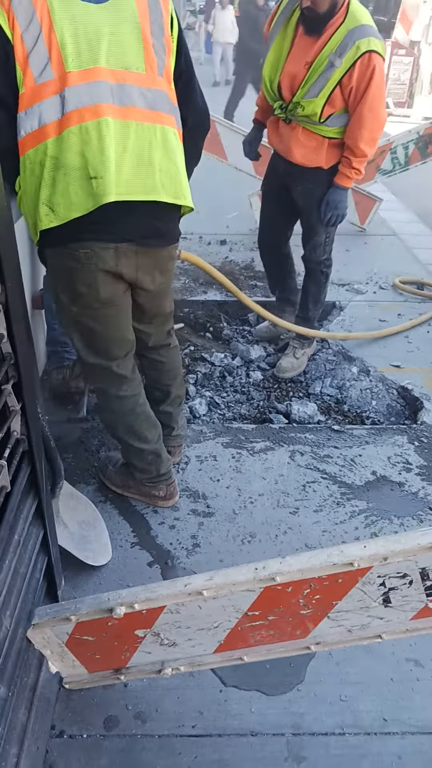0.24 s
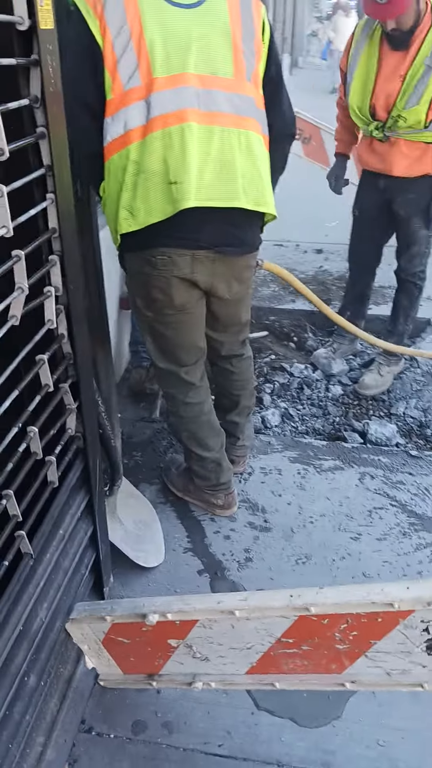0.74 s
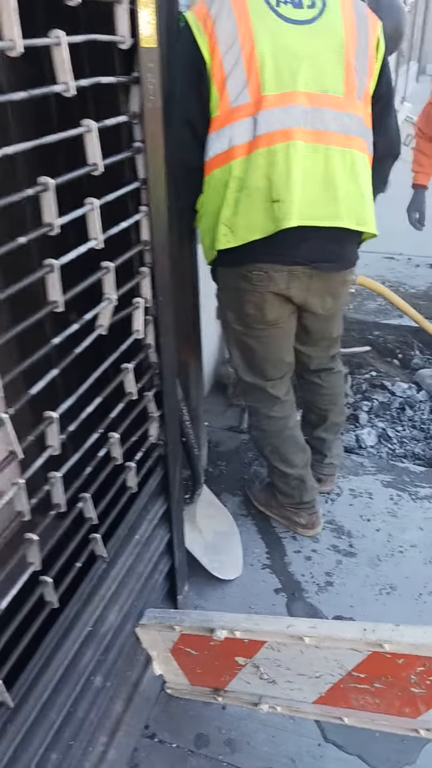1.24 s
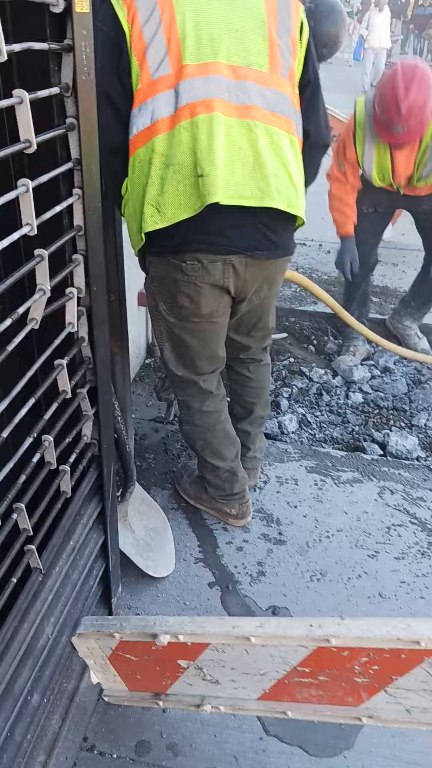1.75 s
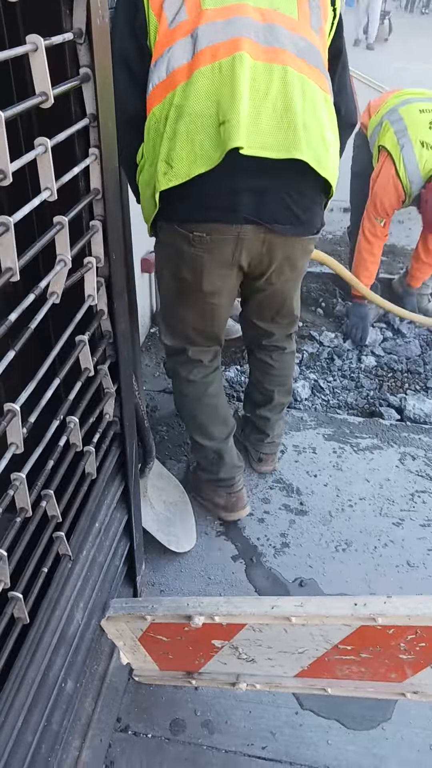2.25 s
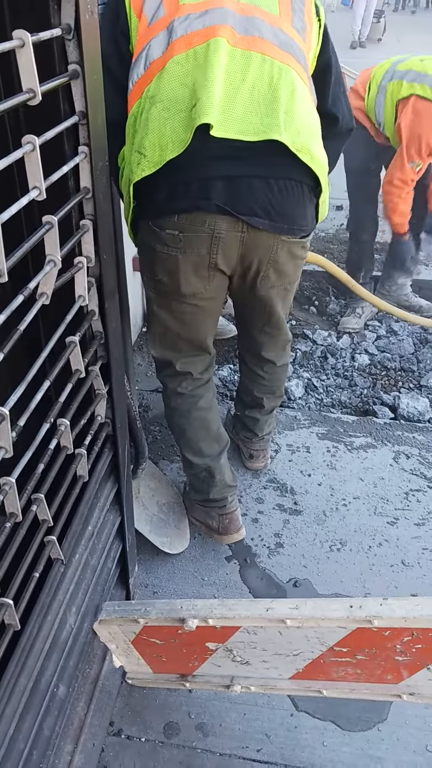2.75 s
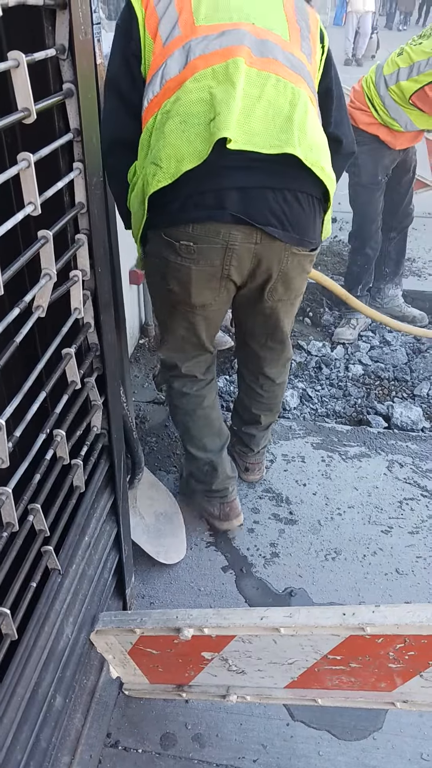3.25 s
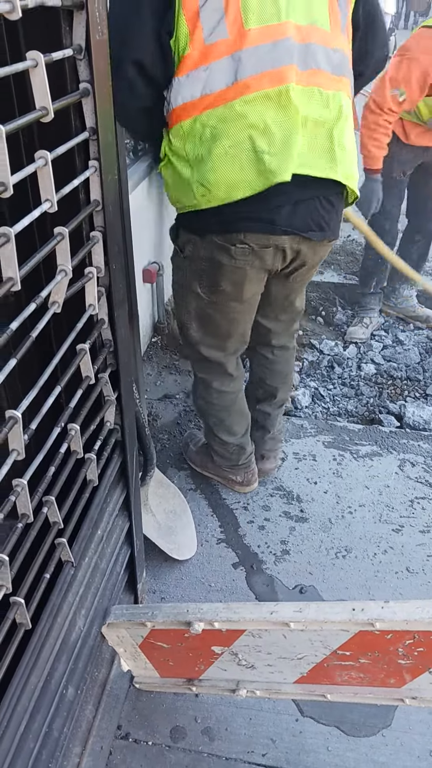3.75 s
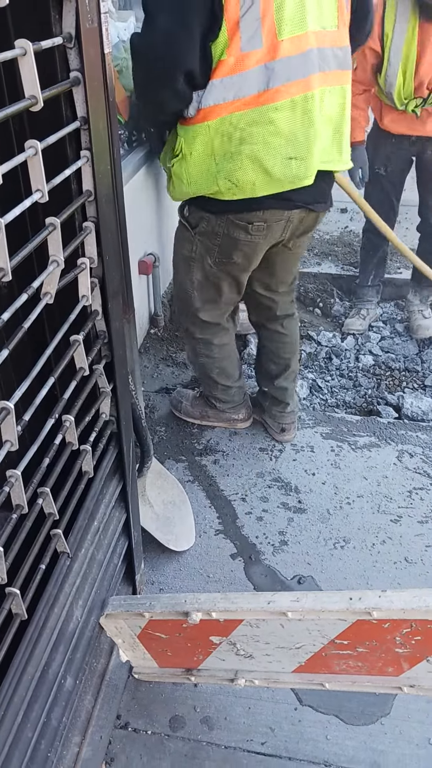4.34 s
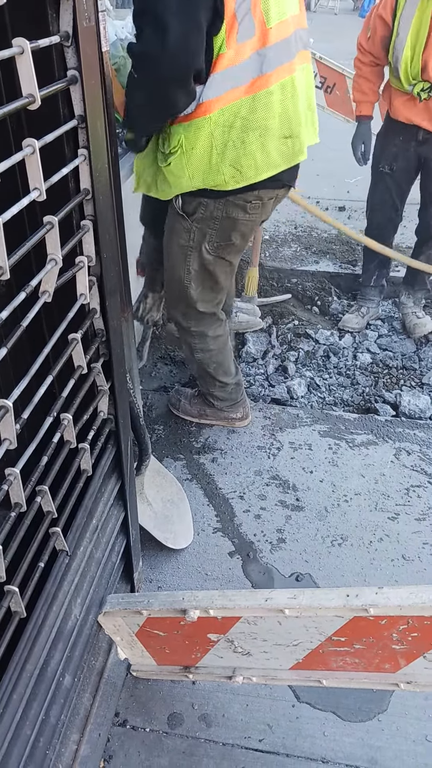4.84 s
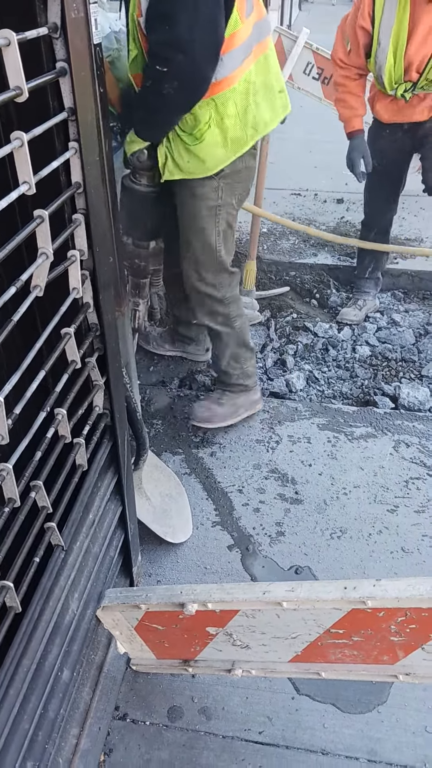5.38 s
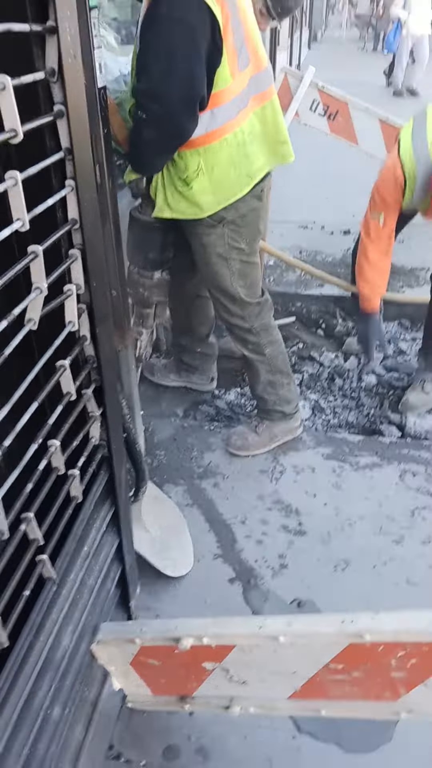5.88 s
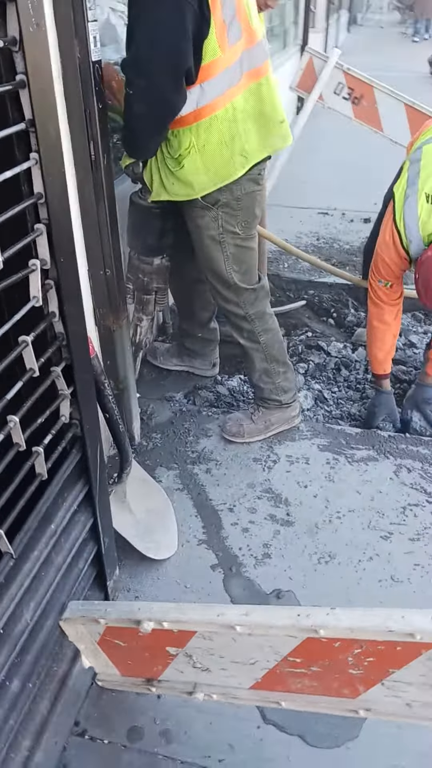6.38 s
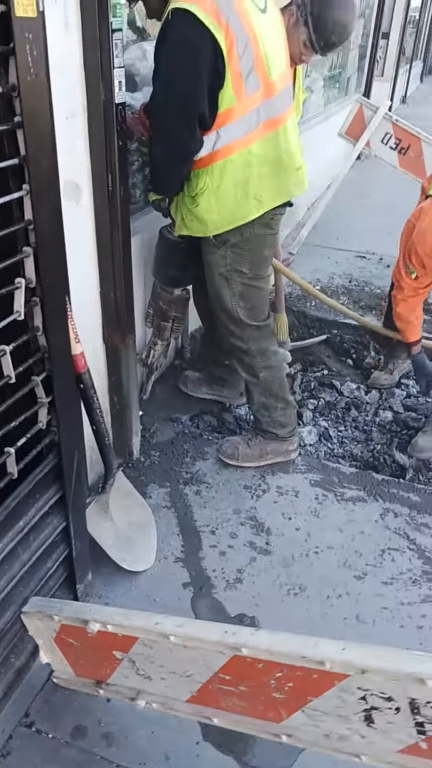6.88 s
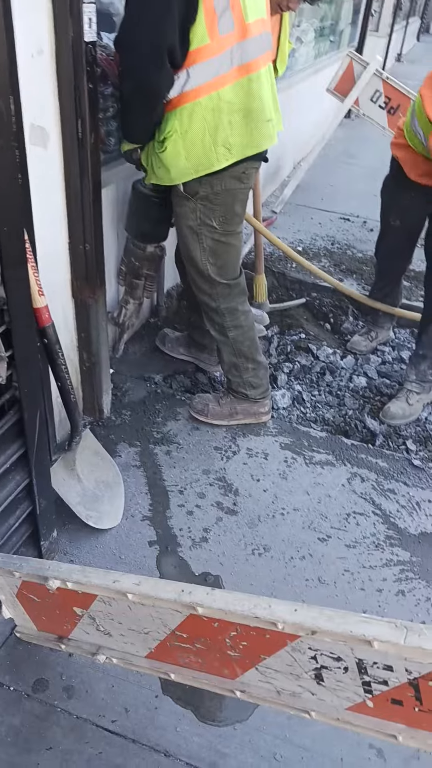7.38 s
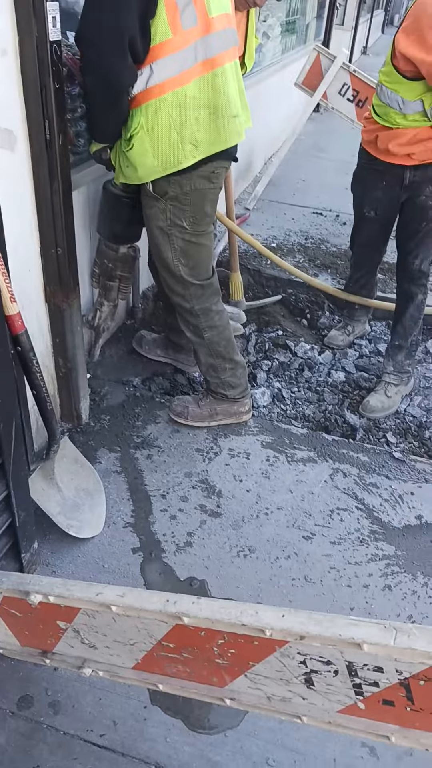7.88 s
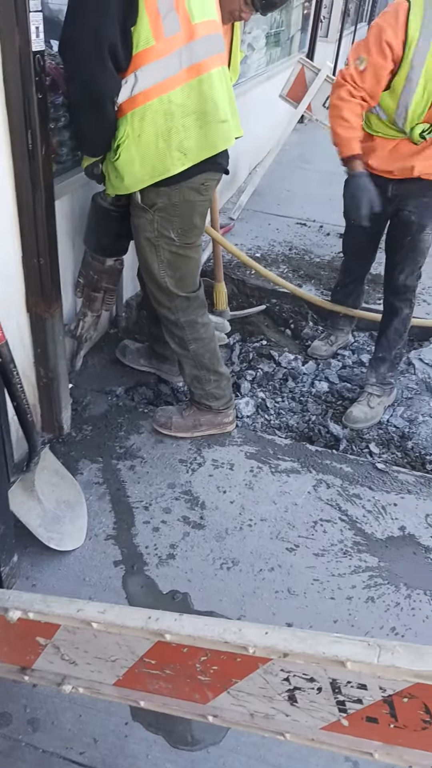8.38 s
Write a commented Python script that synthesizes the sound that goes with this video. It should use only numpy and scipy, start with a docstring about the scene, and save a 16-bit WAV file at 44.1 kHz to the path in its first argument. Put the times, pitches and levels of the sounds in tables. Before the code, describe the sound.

Harsh, rapid jackhammer blows with hissing exhaust stop, the loose bit clanks and scrapes through the break, then hammering resumes until the end on a city street.

```python
"""A breaker hammers pavement about 21 times a second, with pauses in which its loose bit clinks.
Each blow is a crack, a body knock and a collar clank of shaped noise, with exhaust hiss and a ring of the bit.
Exhaust air excites damped chamber modes at the blow, and again at the piston's return.
Behind it a compressor engine sounds as harmonic orders, over rumble, street hiss and a thin air leak.
Street fronts answer with an echo, and two microphone ports pick up the whole."""
import sys
import numpy as np
from scipy import signal
from scipy.fft import rfft, irfft, next_fast_len
from scipy.io import wavfile
from scipy.ndimage import uniform_filter1d

SR = 44100
rng = np.random.default_rng(int(sys.argv[2]) if len(sys.argv) > 2 else 0)


def convert_level_to_amplitude(level_db):
    """Map a level in decibels to its linear amplitude factor."""
    exponent = np.asarray(level_db, float) / 20
    return 10 ** exponent


def output_pcm(signal):
    """Save a mono or channel-first signal as 16-bit PCM at the path in sys.argv[1].

    Samples are clipped to [-1, 1] before scaling.
    """
    pcm = np.clip(np.atleast_2d(signal).T, -1, 1) * 32767
    wavfile.write(sys.argv[1], SR, np.round(pcm).astype(np.int16))


N = 380141

RETURN_S = 0.0255  # from the blow to the piston's return

# times at which the operator's stance changes: in front of the tool, then beside it, then leaning on it: start_s
MOVES_S = [4.5, 6.75]

# modes of the steel bit, before each use adds damping and tilt: mode_hz, relative_level_db, t60_s
BIT = [(1860, -2, .09), (3480, 0, .13), (5520, -2, .11), (7830, -6, .1), (9000, -14, .1), (10300, -11, .12),
       (10590, -3, .15), (11090, -1, .1), (11900, -10, .1), (12970, -5, .14), (13400, -4, .14)]

# spectral density of a blow in each stance: frequency_hz, relative_density_db
CRACK_HIDDEN = [(190, -29), (330, -6.5), (478, -6.5), (726, -10.5), (846, -6), (1010, -16.5), (1310, -11),
                (1730, -12), (1900, -9), (2770, -17.5), (3200, -21.5), (4160, -46), (7040, -120)]
CRACK_OPEN = [(190, -8), (330, -5), (411, -10.5), (562, -13), (636, -14), (740, -13.5), (1080, -19),
              (1190, -13), (1410, -15), (2090, -7.5), (2670, -20), (3200, -16.5), (4160, -45), (7040, -120)]
CRACK_LEANING = [(190, -36), (330, 2), (407, 0.5), (567, 0.5), (680, -9), (806, -4.5), (887, -20),
                 (939, -6.5), (1510, -7), (1830, 0), (2410, -4.5), (3200, -9), (4160, -50), (7040, -120)]
CRACKS = [CRACK_HIDDEN, CRACK_OPEN, CRACK_LEANING]


def evened(x):
    """Normalization: scales a signal to an rms of 1."""
    return x / np.sqrt(np.mean(x ** 2) + 1e-20)


def read(points, hz):
    """Spectral interpolation: reads a table on a log-frequency axis."""
    f, value = np.transpose(points)
    return np.interp(np.log(hz + 1), np.log(f + 1), value)


def noise(colour):
    """Spectral shaping: two uncorrelated steady noises of one colour, together at rms 1."""
    size = next_fast_len(N)
    spectrum = rfft(rng.standard_normal((2, size)))
    spectrum = spectrum * convert_level_to_amplitude(read(colour, np.fft.rfftfreq(size, 1 / SR)))
    return evened(irfft(spectrum, size)[:, :N])


def train(s, size):
    """Impulse excitation: single clicks of given sizes at given times."""
    out = np.zeros(N + SR)
    at = np.clip(np.round(np.asarray(s) * SR).astype(int), 0, N)
    np.add.at(out, at, size)
    return out[:N]


def bursts(s, db, rise, t60):
    """Incoherent addition: the envelope of noise bursts whose powers add up."""
    t = np.arange(SR // 4) / SR
    power_shape = (1 - np.exp(-t / rise)) ** 2 * convert_level_to_amplitude(-2 * 60 * t / t60)
    power = signal.oaconvolve(train(s, convert_level_to_amplitude(2 * db)), power_shape / power_shape.max())[:N]
    return np.sqrt(np.abs(power))


def street():
    """Superposition: compressor engine orders, traffic rumble, far hiss and a narrow-band air leak."""
    # course of the background; the compressor labours after the false start; levels precede the mix gains:
    # time_s, engine_third_order_hz, engine_level_db, rumble_level_db, hiss_level_db
    background = [(2.35, 63.8, -35, -40.5, -47.5), (2.6, 63.8, -42, -41.5, -50.5),
                  (3.3, 63.8, -33.5, -43.5, -50), (3.8, 63.8, -39, -37.5, -46.5),
                  (4.2, 63.8, -33.5, -44, -49.5), (4.8, 63.8, -39, -41.5, -49.5),
                  (5.13, 62.5, -27, -36, -43.5), (5.2, 62.5, -33, -31.5, -40.5),
                  (5.5, 62.5, -25, -31.5, -40), (5.62, 61.7, -33, -37, -41.5), (8.6, 62.6, -30.5, -44, -52)]
    # harmonics of the engine's rotation: order, relative_level_db
    engine_orders = [(2, -10), (3, -0.5), (4, -2.5), (6, -5.5), (8, -11)]
    # spectral density of the rumble: frequency_hz, relative_density_db
    rumble_colour = [(12, -46), (20, -19), (38, -13), (49, -3.5), (70, -2.5), (97, -14.5), (170, -8),
                     (187, -15.5), (258, -18), (500, -34), (650, -68), (1100, -120)]
    # spectral density of the street hiss: frequency_hz, relative_density_db
    street_colour = [(240, -5.5), (400, 3.5), (511, -3), (1030, -5.5), (1380, -2), (1720, -5.5),
                     (2800, -9.5), (5760, -19.5), (6310, -20), (6820, -17.5), (7360, -21.5), (12400, -15),
                     (15600, -18.5)]
    leak_hz, leak_half_width_hz, leak_under_hiss_db = 6830, 160, -18.5
    waver_db, waver_s = 1.5, 0.05  # rms depth and averaging time

    s, *columns = np.transpose(background)
    hz, engine_db, rumble_db, hiss_db = (np.interp(np.arange(N) / SR, s, c) for c in columns)
    turns = np.cumsum(hz / 3) / SR
    engine = 0
    for order, db in engine_orders:
        phase = rng.random() + 0.13 * rng.standard_normal((2, 1))  # in turns, scattered between both points
        engine = engine + convert_level_to_amplitude(db) * np.sin(2 * np.pi * (order * turns + phase))
    waver = evened(uniform_filter1d(rng.standard_normal(N), round(waver_s * SR)))
    engine = evened(engine) * convert_level_to_amplitude(waver_db * waver)  # the hum wavers
    leak = noise([(leak_hz - leak_half_width_hz, -40), (leak_hz, 0), (leak_hz + leak_half_width_hz, -40)])
    far = noise(street_colour) + convert_level_to_amplitude(leak_under_hiss_db) * leak
    return convert_level_to_amplitude(engine_db - 5) * engine + convert_level_to_amplitude(rumble_db + 2) * noise(rumble_colour) + convert_level_to_amplitude(hiss_db + 2.5) * far


def fronts(x):
    """Diffuse reflection: sparse echoes of random sign from the street fronts, each band decaying at its own rate."""
    # echo decay: frequency_hz, t60_s
    front_decay = [(100, 0.41), (500, 0.31), (2000, 0.4), (8000, 0.1), (16000, 0.15)]
    taps = np.zeros((2, SR // 2))
    at = np.arange(300, SR // 2 - 20, 20) + rng.integers(0, 20, (2, (SR // 2 - 301) // 20))
    np.put_along_axis(taps, at, rng.choice([-1., 1.], at.shape), 1)
    hz, t, z = signal.stft(taps, SR, nperseg=256)
    decay = convert_level_to_amplitude(-60 * t / read(front_decay, hz)[:, None])
    tail = signal.istft(z * decay, SR, nperseg=256)[1]
    return signal.fftconvolve(x, tail / np.linalg.norm(tail[0]), axes=1)[:, :N]


def bit_ring(low, high, at, patchy_db, damping, split, tilt_db):
    """Modal resonance: two noise drives ring the bit's low and high modes, each blow favouring different ones."""
    t, out = np.arange(SR // 4) / SR, np.zeros((2, N))
    which = np.searchsorted(np.sort(at), np.arange(N) / SR)
    chance = rng.standard_normal((len(at) + 1, len(BIT)))
    for k, (hz, db, t60) in enumerate(BIT):
        mode_db = db + tilt_db * np.log2(max(hz / split, 1))  # tilt per octave above the split
        mode = convert_level_to_amplitude(mode_db - 60 * damping * t / t60) * np.sin(2 * np.pi * hz * t)
        envelope = low if hz < split else high
        drive = envelope * rng.standard_normal((2, N)) * convert_level_to_amplitude(patchy_db * chance[which, k])
        out += signal.oaconvolve(drive, mode[None], axes=1)[:, :N]
    return out


def clinks():
    """Contact excitation: the loose bit knocks and drags, ringing its modes and scuffing as noise."""
    # contacts, ring levels before the mix gains: start_s, low_ring_db, high_ring_db, scuff_db, length_s
    contacts = [(2.877, -87, -78, -42.5, 0.015), (3.09, -63, -79, -53.5, 0.025),
                (3.395, -62, -75, -49, .04), (3.46, -43, -54, -34.5, 0.093),
                (3.731, -42, -47.5, -42.5, 0.084), (3.8, -42, -68, -55, 0.051),
                (3.876, -48, -59, -41, 0.017), (3.894, -35, -49, -40, 0.038), (3.928, -33, -53, -42, 0.038),
                (3.955, -46, -43, -38, 0.043), (4.054, -62, -63.5, -46, 0.011),
                (4.106, -49, -69, -42.5, 0.037), (4.147, -40, -76, -39, 0.024),
                (4.202, -55, -70, -46, 0.025), (4.346, -66, -61, -45.5, .04), (4.907, -34, -49, -39, 0.024),
                (4.926, -32, -46, -50, 0.04), (5.01, -37, -32.5, -46, 0.042), (5.304, -55, -70, -36, 0.032),
                (5.504, -53, -65, -34, 0.082), (5.561, -40, -50, -27, 0.019)]
    # spectral density of the scuff: frequency_hz, relative_density_db
    scuff_colour = [(250, -20), (550, -4), (1000, -7.5), (2000, 4.5), (3800, -3), (6000, -11), (15000, -17)]
    level = np.zeros((3, N))
    for s, *layer_db, length in contacts:
        u = np.arange(round(3 * length * SR)) / SR / length
        shape = np.exp(-u ** 2) * (1 - np.exp(-u / 0.091))
        start = round(s * SR)
        level[:, start:start + len(u)] += np.outer(convert_level_to_amplitude(np.array(layer_db)), shape)
    roughness = evened(uniform_filter1d(rng.standard_normal(N), 90))
    low, high, scuff = level * convert_level_to_amplitude(3 * roughness)
    at = np.array(contacts)[:, 0]
    rung = bit_ring(low, convert_level_to_amplitude(8.5) * high, at, patchy_db=2, damping=2.7, split=BIT[2][0], tilt_db=-9.0)
    return convert_level_to_amplitude(-23.5) * rung + scuff * noise(scuff_colour)


def all_blows():
    """Quasi-periodic excitation: rows (s, hiss, crack, puff, return, low ring, high ring) of every blow."""
    # pace of the two long bursts, one list each: time_s, blows_struck_so_far
    pace = [
        [(0.0051, 0), (1.1214, 23), (1.4535, 30), (1.7414, 36), (1.8884, 39), (2.0784, 43), (2.127, 44)],
        [(5.6132, 0), (6.042, 9), (6.6222, 21), (7.1066, 31), (7.441, 38), (7.8275, 46), (8.2586, 55),
         (8.597, 62)],
    ]
    # mean blow as the work goes on, levels before the mix gains:
    # time_s, hiss_db, crack_db, low_puff_db, return_relative_to_blow_db, bit_ring_db
    work = [(0, -20, -23, -12.5, -7, -38), (.4, -20.5, -24.5, -14.5, -4.5, -33),
            (.9, -18, -22.5, -14, -10.5, -37), (1.3, -19.5, -24.5, -15.5, -4.5, -33.5),
            (1.6, -18, -23, -14.5, -4.5, -30), (1.85, -20, -25.5, -16, -6.5, -36),
            (2.13, -18.5, -21.5, -12.5, -9, -36), (5.62, -18, -23, -13, -4, -32),
            (5.85, -17, -21.5, -14.5, -7.5, -28.5), (5.97, -21, -26, -17.5, -3, -35),
            (6.1, -18.5, -23, -14, -9, -31.5), (6.6, -18, -22.5, -16, -11, -28),
            (6.9, -17.5, -20.5, -20, -12.5, -32.5), (7.05, -20, -25.5, -19.5, -6, -30.5),
            (7.45, -18.5, -24.5, -19, -10.5, -32), (8.0, -17.5, -24, -18.5, -10, -33.5),
            (8.6, -18, -23, -19.5, -10.5, -56)]
    # a deeper bite is louder and bounces the piston less; rows are hiss, crack, puff, return, low and high ring:
    # change_per_bite_db, own_scatter_db (both times a limited random draw)
    scatter = [(0.46, .5), (0.5, 0.3), (0.6, 0), (-3, 2), (0, 2.5), (-2, 2)]
    # uneven blows, and one valve sputter of three quick air puffs near 5.56 s, levels before the mix gains:
    # start_s, hit_db, low_puff_db, return_relative_to_blow_db, bit_ring_db
    stumbles = [(2.182, -23.5, -16.5, -24, -31), (3.481, -29, -16, -4, -32.5), (3.506, -21, -15, -14, -27),
                (3.528, -19.5, -16, -5, -43), (3.5735, -18.5, -13.5, -6.5, -33),
                (3.6215, -15.5, -17.5, -8, -28), (3.6755, -35, -21.5, -10, -51), (4.97, -25, -23, -20, -23),
                (5.005, -25.5, -10, -8, -33), (5.081, -32.5, -18.5, -22, -50), (5.555, -38, -14, -20, -42),
                (5.562, -36, -12, -20, -45), (5.568, -30.5, -14, -20, -43), (5.593, -19, -24, -21, -37)]
    jitter_s, chance_limit = 0.0004, 1.8  # the limit is in standard deviations
    crack_under_hiss_db, high_under_low_ring_db = -3, -7  # in the stumbles

    runs = []
    for run in pace:
        run_s, count = np.transpose(run)
        runs.append(np.interp(np.arange(run[-1][1] + 1), count, run_s))
    s = np.concatenate(runs)
    at, *layers = np.transpose(work)
    mean_db = np.transpose([np.interp(s, at, db) for db in layers + layers[-1:]])  # both rings share a mean
    bite_db, own_db = np.transpose(scatter)
    chance = np.clip(rng.standard_normal((len(s), 2 + len(scatter))), -chance_limit, chance_limit)
    steady_db = mean_db + bite_db * chance[:, 1:2] + own_db * chance[:, 2:]
    steady = np.c_[s + jitter_s * chance[:, 0], steady_db]
    s, hit, puff, back, ring = np.transpose(stumbles)
    odd = np.c_[s, hit, hit + crack_under_hiss_db, puff, back, ring, ring + high_under_low_ring_db]
    rows = np.r_[steady, odd]
    return rows[np.argsort(rows[:, 0])]


def strokes(blows, column, back_db):
    """Reciprocating motion: times and levels of the blows, then of the piston's returns."""
    s, back_under, db = blows[:, [0, 4, column]].T
    return (s, db), (s + RETURN_S, db + back_under + back_db)


def puffs(blows):
    """Cavity resonance: exhaust air kicks the damped chamber modes; the return stroke is duller."""
    # air modes of the exhaust chamber, neighbours in opposite sign: mode_hz, relative_level_db, t60_s
    chamber = [(41.8, -31, 0.096), (91.2, -19, 0.1), (138.5, -0.5, 0.027), (212.6, -10.5, 0.059),
               (290.4, -12, 0.05), (384.6, -11.5, 0.022), (530, -28.5, 0.043), (835, -28.5, 0.036)]
    # added level of the chamber modes above 250 Hz: time_s, level_db
    open_port = [(0, 5), (0.55, 6.5), (0.9, -7), (1.1, -3.5), (1.3, 4.5), (1.5, 5.5), (1.7, -0.5),
                 (1.95, 4.5), (3.55, -5), (5.65, 0.5), (5.9, 7), (6.15, 0.5), (6.4, 4), (7.9, 5.5),
                 (8.4, 0.5)]
    # return puff relative to the blow's, one value for each stance: level_db
    return_puff_db = [-6, -5.5, -3.5]
    # added level of the two deepest chamber modes, one value for each stance: level_db
    deep_mode_db = [-0.2, -1.1, 3.5]
    idle_return_db, return_dull_db_per_octave = -16, -5

    blow_s, blow_db = blows[:, [0, 3]].T
    gap = np.diff(blow_s, append=blow_s[-1] + 0.05)
    running = (gap > 0.035) & (gap < 0.06)
    s = np.r_[blow_s, blow_s + RETURN_S] - 0.0025
    full_return_db = np.take(return_puff_db, np.searchsorted(MOVES_S, blow_s))
    back_db = np.where(running, full_return_db, idle_return_db)  # a full return only at working pace
    puff_db = np.r_[blow_db, blow_db + back_db]
    is_return = np.arange(len(s)) >= len(blows)
    chance = rng.standard_normal((len(s), len(chamber)))
    deep_db = np.take(deep_mode_db, np.searchsorted(MOVES_S, s))
    upper_db = np.interp(s, *np.transpose(open_port))
    t, out = np.arange(SR // 5) / SR, np.zeros(N)
    for k, (hz, db, t60) in enumerate(chamber):
        mode = (-1) ** k * convert_level_to_amplitude(db - 60 * t / t60) * np.sin(2 * np.pi * hz * t) * (1 - np.exp(-t / 0.01))
        dull_db = return_dull_db_per_octave * np.log2(max(hz, 80) / 148) * is_return
        share_db = 0.24 * chance[:, k] + dull_db + upper_db * (hz > 250) + deep_db * (hz < 110)
        out += signal.oaconvolve(train(s, convert_level_to_amplitude(puff_db + share_db)), mode)[:N]
    air = noise([(40, -10), (100, -5), (300, -5.5), (450, -13), (700, -23)])
    air = air * bursts(s, puff_db - 12.5, 0.0015, 0.061)
    return convert_level_to_amplitude(15) * out + air


def blow_noise(blows, colours, column, back_db, rise, t60, back_t60, grit_db, patchy_db):
    """Amplitude modulation: noise gated by every stroke and roughened by chips flying off."""
    blow, back = strokes(blows, column, back_db)
    level = np.hypot(bursts(*blow, rise, t60), bursts(*back, rise, back_t60))
    grit = evened(uniform_filter1d(rng.standard_normal(N), 60))
    stance = np.searchsorted(MOVES_S, np.arange(N) / SR)
    steady = np.choose(stance, [noise(c) for c in colours])
    z = signal.stft(steady, nperseg=256)[2]
    patches = rng.standard_normal(z.shape[:0:-1]).T  # the colour shifts within tens of milliseconds
    patches = uniform_filter1d(patches, size=3, axis=0)
    patches = evened(uniform_filter1d(patches, size=10, axis=1))
    patchy = signal.istft(z * convert_level_to_amplitude(patchy_db * patches), nperseg=256)[1][:, :N]
    return patchy * level * convert_level_to_amplitude(grit_db * grit)


def clank(blows):
    """Impact noise: the steel collar clanks briefly at blow and return, strongest with the operator beside the tool."""
    # spectral density of the clank: frequency_hz, relative_density_db
    clank_colour = [(1500, -39), (1850, -9.5), (2120, -2), (2400, -8), (2900, -19)]
    # clank relative to the crack's table level, one value for each stance: level_db
    stance_db = [-8.5, 4.5, 0]
    s, db = np.concatenate(strokes(blows, column=2, back_db=3), axis=1)
    db = db + np.take(stance_db, np.searchsorted(MOVES_S, s))
    return noise(clank_colour) * bursts(s, db, rise=0.0005, t60=0.034)


def knocks(blows):
    """Periodic repetition: the tool body answers blows in one stance alike, which gives the buzz its pitch."""
    s, db = blows[:, [0, 1]].T
    t, out = np.arange(SR // 10) / SR, np.zeros((2, N))
    for k, colour in enumerate(CRACKS):
        body = noise(colour)[:, :len(t)] * (1 - np.exp(-t / 0.00028)) * convert_level_to_amplitude(-60 * t / 0.098)
        here = np.searchsorted(MOVES_S, s) == k
        out += signal.oaconvolve(train(s, convert_level_to_amplitude(db) * here)[None], body, axes=1)[:, :N]
    return signal.sosfilt(signal.butter(2, [400, 1150], "band", fs=SR, output="sos"), out)


def breaker(blows):
    """Percussive excitation: knock, clank, crack, hiss and bit ring of all the blows, superposed."""
    # spectral density of the exhaust hiss, operator in front of the tool: frequency_hz, relative_density_db
    hiss_hidden = [(1650, -32), (2800, -2), (3380, -2), (3730, -2.5), (4900, -4.5), (5580, -1), (6540, -6),
                   (7440, -8), (8230, -6.5), (10700, -1), (13000, -1.5), (15600, -6)]
    # the same for the two later stances: frequency_hz, relative_density_db
    hiss_open = [(1650, -39), (2800, -2), (3380, -1), (4600, -4.5), (5660, -4), (6630, -6.5), (8290, -10.5),
                 (9100, -4), (10100, -5), (10900, -2.5), (12900, -2), (15600, -6)]
    early = blows.copy()
    early[:, 0] -= 0.00047  # the crack comes half a millisecond before the exhaust hiss
    crack = blow_noise(early, CRACKS, column=2, back_db=2.5, rise=0.00025, t60=0.12, back_t60=0.06,
                       grit_db=2.0, patchy_db=1.7)
    crack = signal.sosfilt(signal.butter(2, 800, "high", fs=SR, output="sos"), crack)
    hiss = blow_noise(blows, [hiss_hidden, hiss_open, hiss_open], column=1, back_db=0.1, rise=0.0013,
                      t60=0.11, back_t60=0.063, grit_db=1.0, patchy_db=2.5)
    s, low_db, high_db = blows[:, [0, 5, 6]].T
    low = bursts(s, low_db - 17.5, 0.00039, 0.09)
    high = bursts(s, high_db - 18.5, 0.0009, 0.059)
    ring = bit_ring(low, high, s, patchy_db=3.0, damping=2.7, split=BIT[3][0], tilt_db=10.0)
    return convert_level_to_amplitude(0.5) * knocks(blows) + clank(blows) + convert_level_to_amplitude(4.0) * crack + convert_level_to_amplitude(2.5) * hiss + ring


def scene():
    """Superposition of direct sound, echo and background, as met at two nearby points."""
    blows = all_blows()
    tool = breaker(blows) + clinks()
    air = puffs(blows)
    echo = fronts(convert_level_to_amplitude(-11.5) * tool + convert_level_to_amplitude(-9.5) * air)
    return tool + air + echo + street()


def low_pass(x):
    """Removes everything above the highest recorded frequency."""
    return signal.sosfilt(signal.butter(12, 16800, fs=SR, output="sos"), x)


def record(dry):
    """Spatial coherence: two ports alike in the bass, apart in the treble; low cut, soft overload, band limit."""
    # colour difference of the microphone ports: frequency_hz, left_minus_right_db
    port_db = [(60, 1.4), (110, -1.5), (200, -4.5), (380, -4.0), (700, -2.0), (1290, 2.5), (2380, -3.0),
               (4400, 5.5), (8120, 8.5), (15000, 7.5)]
    # likeness of the ports: frequency_hz, likeness_0_to_1
    port_same = [(40, 0.53), (90, 0.52), (200, 0.97), (400, 0.72), (700, 0.41), (1100, 0.038),
                 (2000, 0.043), (4000, 0.024), (8000, 0.0099), (15000, 0.017)]
    left_lead_s, low_cut_hz, edge_hz = 0.0002396, 34, 15900  # the left port is nearer the tool

    size = next_fast_len(N)
    hz = np.fft.rfftfreq(size, 1 / SR)
    a, b = rfft(dry, size)
    same = np.clip(read(port_same, hz), 0, 1)
    own = np.sqrt(1 - same)
    common = np.sqrt(same) * (a + b) / 2 * np.sqrt(2 - same)
    half_db = read(port_db, hz) / 2
    left = (common + own * a) * convert_level_to_amplitude(half_db) * np.exp(2j * np.pi * hz * left_lead_s)
    right = (common + own * b) * convert_level_to_amplitude(-half_db)
    low_cut = 1 / np.sqrt(1 + (low_cut_hz / (hz + 1)) ** 8)
    x = irfft(np.array([left, right]) * low_cut, size)[:, :N]
    x = 1.172 * np.tanh(x / 1.204)  # soft overload
    edge = signal.firwin(255, edge_hz, window=("kaiser", 7), fs=SR)
    mix = signal.oaconvolve(x, edge[None], "same", axes=1)
    return low_pass(mix)


dry = scene()
out = record(dry)
output_pcm(out)
```